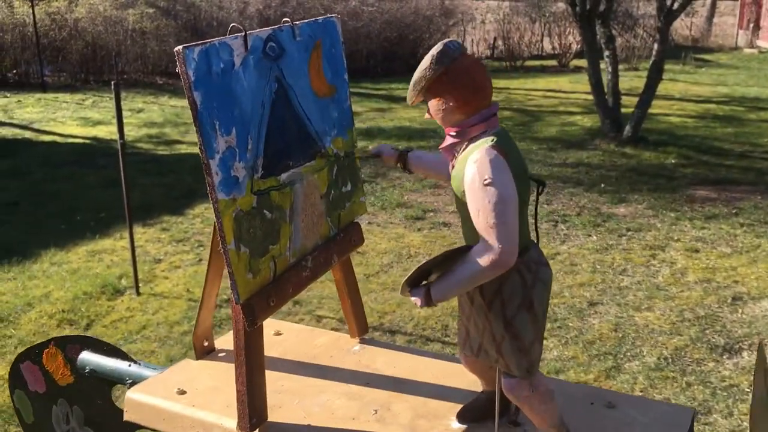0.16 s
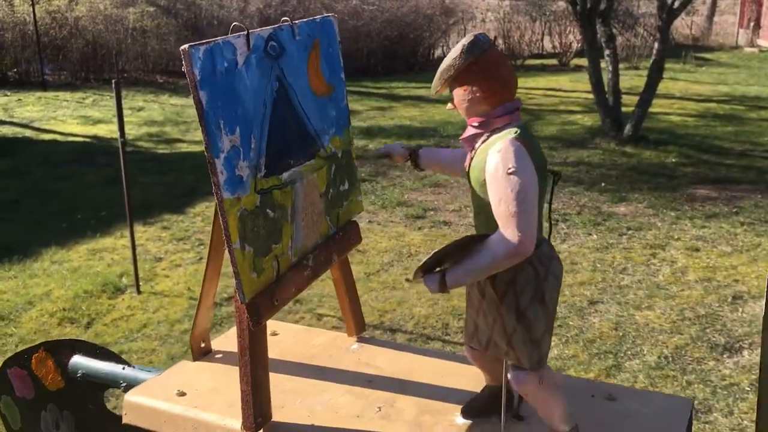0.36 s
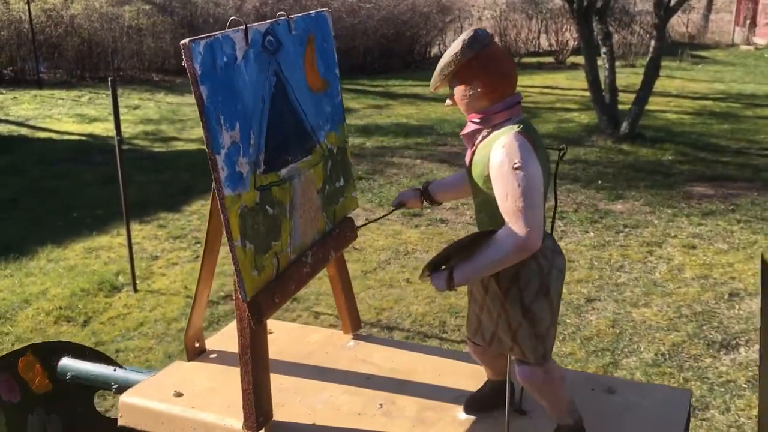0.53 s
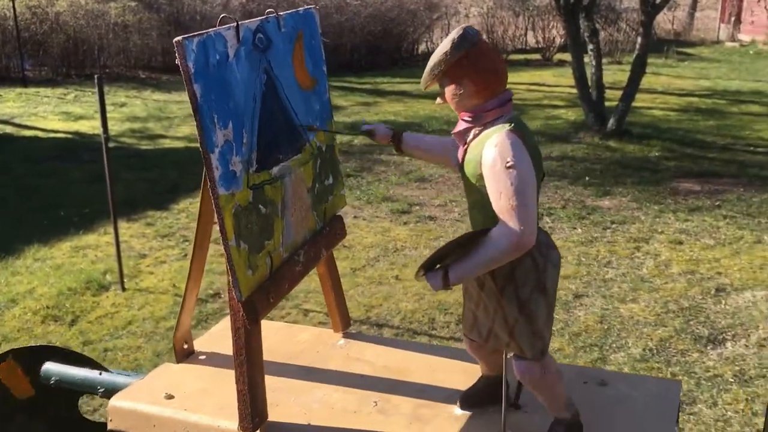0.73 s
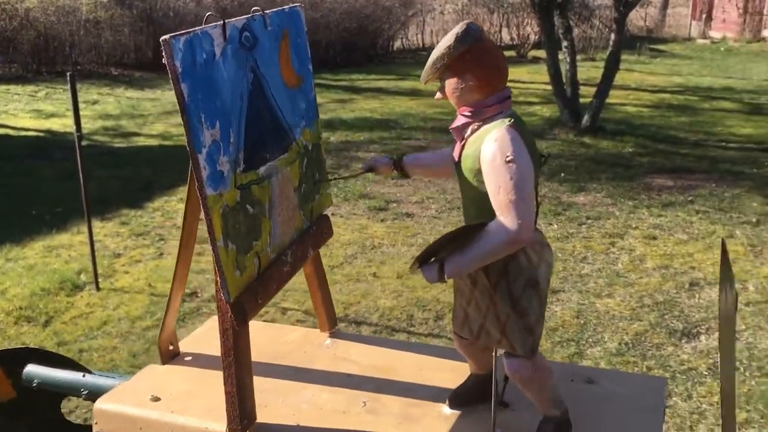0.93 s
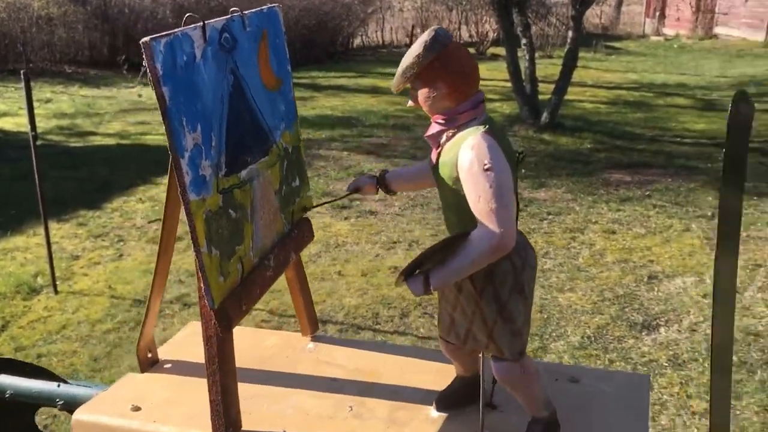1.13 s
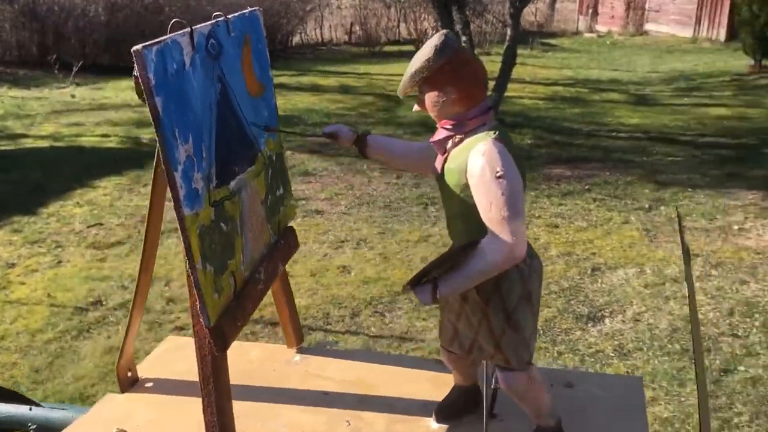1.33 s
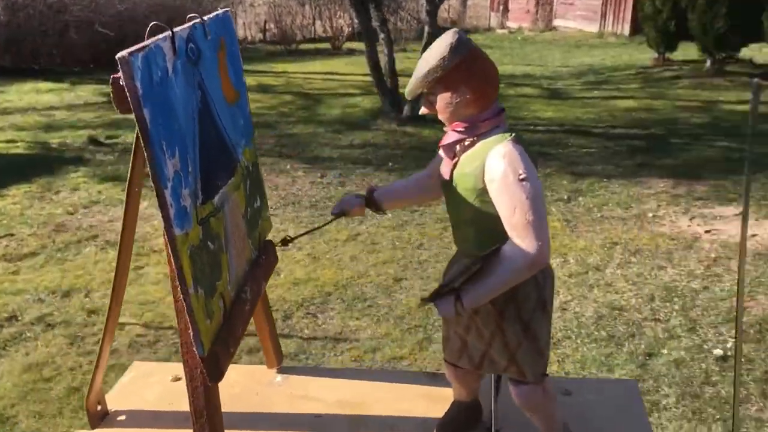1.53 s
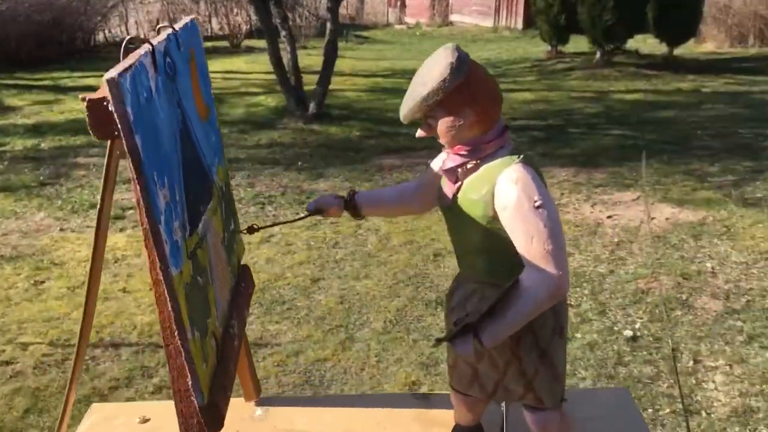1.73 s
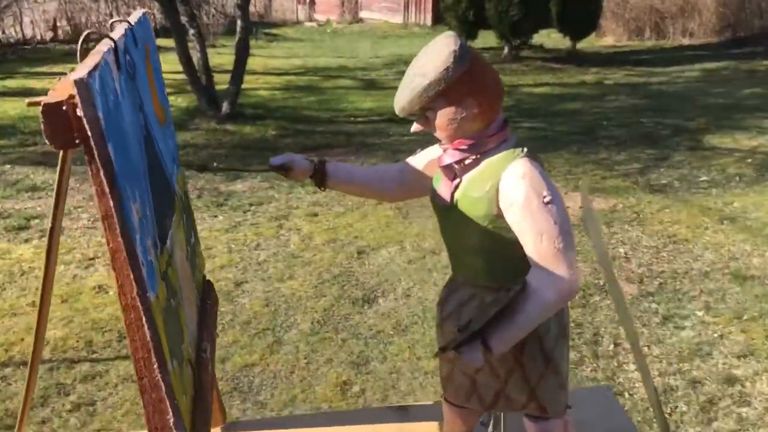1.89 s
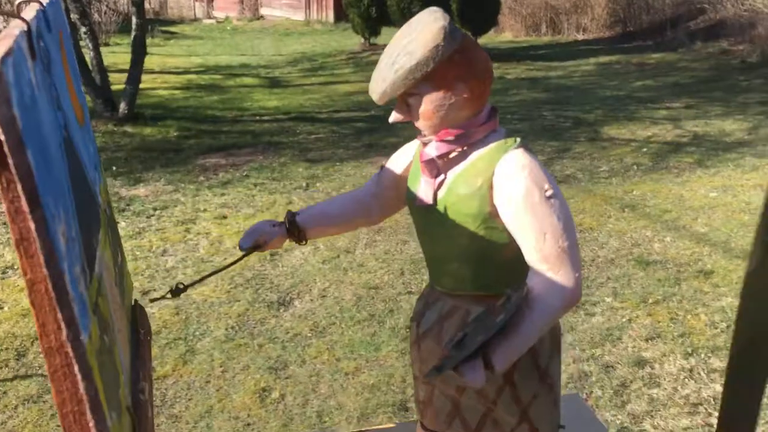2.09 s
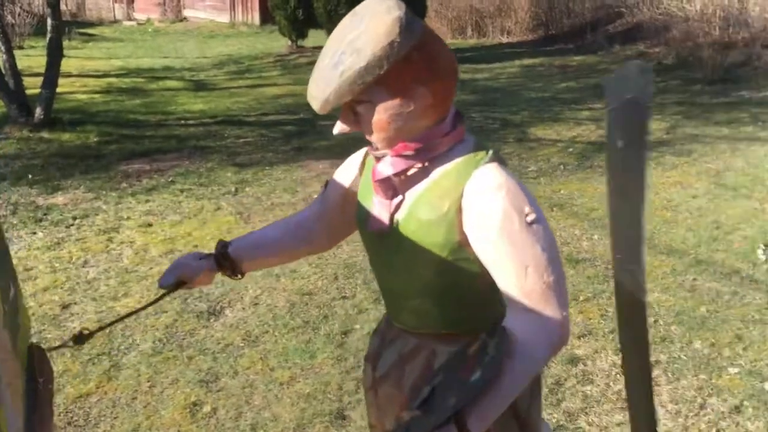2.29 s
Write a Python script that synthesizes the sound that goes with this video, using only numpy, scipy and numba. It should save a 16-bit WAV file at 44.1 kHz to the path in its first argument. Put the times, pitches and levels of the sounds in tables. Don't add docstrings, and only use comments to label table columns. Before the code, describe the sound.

Wooden garden figure knocks, scrapes and squeaks as wind cranks it, with gusts buffeting the microphone

```python
import sys
import numpy as np
from scipy import signal
from scipy.io import wavfile
from scipy.ndimage import uniform_filter1d
from numba import njit

SR = 44100
rng = np.random.default_rng(int(sys.argv[2]) if len(sys.argv) > 2 else 0)


def dump(signal):
    limited = np.clip(np.atleast_2d(signal).T, -1, 1)
    pcm = np.round(limited * 32767).astype(np.int16)
    wavfile.write(sys.argv[1], SR, pcm)


def undo_db(level):
    steps = np.asarray(level, float) / 20
    return 10 ** steps


N = 103635

# [t/s, peak level/dB, wood level/dB, tick level/dB]
KNOCKS = [(0.0014, -38.5, -1.5, -70), (0.0798, -37, 1.5, -71), (0.207, -59, 1.5, -68),
          (0.2307, -52, 11.5, -78), (0.4206, -34, 4.5, -78), (0.4688, -39, -0.5, -77),
          (0.609, -35.5, -17, -74), (0.627, -33, -2.5, -70), (0.7159, -29.5, -4.5, -73),
          (0.7396, -29.5, -5, -64), (0.7525, -37.5, 2.5, -74), (0.9718, -36.5, 4.5, -72),
          (1.295, -32.5, -6, -77), (1.31, -30.5, -5, -62.5), (1.5268, -13.5, -8, -50.5),
          (1.586, -47, -4, -67), (1.813, -58, 13, -79), (1.830, -43, 10, -81), (1.8357, -36, 12.5, -84),
          (1.844, -40.5, 11.5, -70), (1.859, -45, 9, -76), (1.87, -39, 11.5, -80), (1.882, -49, 17, -83),
          (1.898, -60, 9, -80), (1.914, -54, 9, -80), (1.5335, -29, 1, -70), (1.538, -31.5, 4.5, -73),
          (2.1119, -22.5, 1, -63), (2.2609, -44.5, 1, -79), (2.283, -48.5, 9, -82)]
# [f/Hz, level/dB, 60 dB decay/s]
WOOD_MODES = [(1040, -15, 0.047), (1528, 3, 0.016), (1631, -1, 0.031), (1866, 2.5, 0.008),
              (2197, -16, 0.03), (2344, -12.5, 0.031)]
# [f/Hz, level/dB, 60 dB decay/s]
WIRE_MODES = [(2653, -12, 0.0099), (3240, -3, 0.016), (3550, -1, 0.0094), (3800, -2.5, 0.012),
              (4100, -5.5, 0.011), (4300, -7.5, 0.013), (4520, -10, .012), (5060, -15, .01),
              (5760, -11, 0.011), (6530, -8, 0.0067), (7370, -13.5, 0.009)]
# [start t/s, length/s, level/dB]
GRINDS = [
    (0.224, 0.035, -65),
    (0.313, 0.045, -68.5),
    (.69, .09, -66),
    (1.25, 0.052, -74),
    (1.534, 0.057, -63),
    (1.828, 0.056, -58.5),
    (2.12, 0.056, -66),
    (2.255, 0.066, -69.5),
]
# [start t/s, length/s, level/dB]
SCRAPES = [
    (0.158, 0.13, -57),
    (0.437, 0.31, -67.5),
    (0.667, 0.16, -56),
    (1.219, 0.16, -55),
    (1.508, 0.029, -80),
    (1.772, 0.2, -56.5),
    (2.245, 0.04, -62),
]
# [f/Hz, width/Hz, level/dB]
GUIDE_MODES = [(1215, 70, 9), (1540, 70, 8), (1880, 55, 7), (3300, 300, -6)]
# [start t/s, length/s, level/dB]
SQUEAKS = [
    (0.102, 0.054, -58),
    (0.625, 0.061, -51),
    (1.159, 0.056, -57),
    (1.731, 0.066, -53.5),
    (2.333, 0.055, -57),
]
OVERTONES_DB = [-31, -28]
# [start t/s, f/Hz, level/dB]
PEEPS = [
    (0.617, 10800, -67.5),
    (1.157, 10960, -64),
    (1.719, 10860, -68.5),
    (2.325, 10900, -70),
]
# [t/s, peak level/dB]
TAPS = [
    (.002, -50),
    (.079, -46.5),
    (.629, -46.5),
    (.717, -43),
    (.731, -49),
    (.756, -42),
    (.971, -47),
    (1.813, -47.5),
    (1.871, -50),
]
# [centre t/s, length/s, level/dB]
GUSTS = [(-0, 0.097, -27), (0.071, 0.046, -31.5), (0.108, 0.072, -26), (0.151, 0.072, -20.5),
         (0.191, 0.061, -19), (0.232, 0.022, -37.5), (0.314, 0.063, -33.5), (0.373, 0.092, -28),
         (0.436, 0.067, -36.5), (0.499, 0.1, -32), (0.55, .06, -49.5), (0.603, 0.019, -43.5),
         (0.644, 0.062, -41.5), (0.754, 0.066, -36.5), (0.8, 0.065, -40), (0.858, 0.092, -44.5),
         (1.095, 0.57, -54.5), (1.208, 0.092, -53.5), (1.277, 0.12, -39), (1.383, 0.072, -24.5),
         (1.408, 0.016, -25), (1.465, 0.07, -29), (1.505, 0.073, -25), (1.58, 0.083, -36.5),
         (1.63, 0.061, -28.5), (1.693, 0.065, -35.5), (1.745, 0.078, -36.5), (1.851, 0.24, -47.5),
         (2.076, 0.086, -39.5), (2.121, 0.084, -47)]
# [centre t/s, length/s, f/Hz, level/dB]
THUMPS = [(.005, 0.063, 300, -40), (0.036, 0.021, 268, -42), (.128, 0.022, 325.4, -32.5),
          (0.158, 0.013, 633, -29), (0.185, 0.016, 572, -32.5), (0.357, 0.034, 276.8, -39.5),
          (0.386, 0.023, 385, -39), (0.446, 0.025, 214, -43), (1.266, .03, 265.4, -47.5),
          (1.382, 0.017, 561.4, -37.5), (1.403, 0.013, 580, -39), (1.379, 0.017, 289.3, -30.5),
          (1.403, 0.013, 310, -28), (1.462, 0.015, 255, -43), (1.503, 0.045, 170.7, -27.5),
          (1.638, 0.028, 373.6, -36), (1.697, 0.034, 296, -45.5), (1.734, 0.02, 214, -42),
          (2.097, 0.05, 198.1, -43.5)]
# [start t/s, length/s, first f/Hz, last f/Hz, level/dB]
WHISTLES = [(1.232, .115, 7830, 7780, -67), (1.42, .075, 5800, 5120, -54), (1.487, .055, 5200, 5145, -58),
            (1.535, .058, 5170, 5145, -59), (1.585, .15, 5140, 5160, -70), (1.728, .06, 4150, 4020, -69),
            (1.79, .045, 4010, 3980, -60), (1.85, .025, 4050, 4050, -62), (.805, .02, 5800, 6200, -69),
            (1.722, .014, 7900, 6600, -63), (1.932, .012, 7500, 6800, -68), (2.3, .012, 7900, 6600, -63),
            (2.165, .012, 5000, 6800, -64), (1.978, .01, 4900, 7000, -67), (1.883, .012, 4900, 7000, -65),
            (1.91, .03, 2250, 2250, -61), (1.852, .04, 2700, 2620, -59)]
# [start t/s, note length/s, top f/Hz, level/dB]
CHIRPS = [
    (1.829, .15, 8330, -65.5),
    (1.993, .17, 8270, -66),
    (2.176, .16, 8170, -62.5),
]
# [start t/s, length/s,
# centre f/Hz, width/Hz, level/dB]
CHATTER = [(.81, .1, 6000, 600, -73), (1.27, .15, 7300, 900, -69), (1.6, .12, 3700, 1100, -66),
           (1.83, .13, 5600, 1500, -69), (1.998, .15, 5600, 900, -67), (2.185, .165, 5650, 1000, -65),
           (.865, .08, 4500, 200, -73), (.99, .11, 4250, 250, -73), (1.13, .1, 4150, 250, -72),
           (2.29, .07, 7300, 1000, -66), (2.1, .1, 7300, 900, -70), (1.92, .08, 7400, 800, -71)]
# [f/Hz, level per Hz/dB]
HUSH_COLOUR = [(150, -5), (774, -11.5), (1560, -14), (2870, -27), (3550, -25.5), (8000, -33.5),
               (10500, -35), (15500, -30.5)]


def set_rms(x, db):
    return x * undo_db(db) / np.sqrt(np.mean(x ** 2))


@njit
def moving_filter(x, hz, damping):
    low, mid = np.empty(len(x)), np.empty(len(x))
    b, l = 0., 0.
    for i in range(len(x)):
        g = np.tan(np.pi * hz[i] / SR)
        v = (b + g * (x[i] - l)) / (1 + g * (g + damping))
        low[i], mid[i] = l + g * v, damping * v
        b, l = 2 * v - b, l + 2 * g * v
    return low, mid


def bandpass(x, hz, width):
    return moving_filter(x, np.full(N, 1. * hz), width / hz)[1]


def ring(x, hz, t60):
    pole = np.exp(2j * np.pi * hz / SR - np.log(1000) / (t60 * SR))
    return signal.lfilter([1], [1, -pole], x).imag


def span(start, length, edge):
    u = np.clip((np.arange(N) / SR - start) / length, 0, 1)
    ramp = np.clip(np.minimum(u, 1 - u) / edge, 0, 1)
    return u, np.sin(np.pi / 2 * ramp) ** 2


def walk(rate):
    k = int(SR / rate)
    steps = np.repeat(rng.standard_normal(N // k + 1), k)
    return 0.85 * uniform_filter1d(uniform_filter1d(steps, k), k)[:N]


def tone(hz):
    return np.sqrt(2) * np.sin(2 * np.pi * np.cumsum(hz) / SR)


def echo(x, t60):
    tail = rng.standard_normal(SR // 2) * 1000. ** (-np.arange(SR // 2) / SR / t60)
    return signal.fftconvolve(x, tail / np.sqrt(np.sum(tail ** 2)))[:N]


def sparks(rate, scatter_db):
    chance, sign, size = rng.random((3, N))
    clicks = (chance < rate / SR) * np.sign(sign - .5)
    return set_rms(clicks * undo_db(-scatter_db * np.log(1 - size)), 0)


def high_pass(x, order, hz):
    return signal.sosfilt(signal.butter(order, hz, "high", fs=SR, output="sos"), x)


def knocks():
    length, t = 4000, np.arange(4000) / SR
    rattle_s, contact_hz, tick_hz = 0.005, 6250, 8900
    knock_db, echo_db, echo_t60_s = -2.5, -9, 0.091
    out, rattle = np.zeros(N), sparks(1500, 1.0)
    soft = signal.butter(3, contact_hz, "low", fs=SR, output="sos")
    all_luck = rng.standard_normal((len(KNOCKS), 17))
    for (s, db, wood_db, tick_db), luck in zip(KNOCKS, all_luck):
        i = int((s + 0.00059) * SR)
        push = np.resize(rattle[i:], length) * 0.1 * np.exp(-t / rattle_s) * np.minimum(t / 0.00064, 1)
        push[0] = .4
        wire, wood = 0, 0
        for k, ((f, g, t60), r) in enumerate(zip(WIRE_MODES, luck)):
            wire = wire + (-1) ** k * undo_db(g + 2 * r) * ring(push, f * (1 + 0.008 * r), t60)
        for (f, g, t60), r in zip(WOOD_MODES, luck[11:]):
            wood = wood + np.sign(r) * undo_db(g + r) * ring(push, f * (1 + 0.005 * r), t60)
        body = signal.sosfilt(soft, wire + undo_db(wood_db) * wood) / 3
        hiss = uniform_filter1d(rng.standard_normal(length), size=3)
        tick = high_pass(hiss * np.exp(-t / 0.0051) * np.minimum(t / 0.00085, 1), 3, tick_hz)
        hit = undo_db(db + knock_db) * body + undo_db(tick_db + 19.5) * tick
        out[i:i + length] += hit[:N - i]
    out = high_pass(out, 3, 780)
    return out + undo_db(echo_db) * echo(out, echo_t60_s)


def grinds():
    grains = sparks(1200, 2.5) * undo_db(2.5 * walk(120))
    wire = 0
    for k, (f, g, t60) in enumerate(WIRE_MODES):
        wire = wire + (-1) ** k * undo_db(g) * ring(grains, f, t60)
    return set_rms(wire, 0) * sum(undo_db(db) * span(s, n, 0.2)[1] for s, n, db in GRINDS)


def scrapes():
    slips = sparks(4000, 2.5) * undo_db(2.2 * walk(80))
    out = 0
    for f, width, g in GUIDE_MODES:
        late = 0.035 * np.log2(1900 / min(f, 1900))
        strokes = sum(undo_db(db) * span(s + late, n, 0.36)[1] for s, n, db in SCRAPES)
        grating = set_rms(bandpass(bandpass(slips, f, width), f, f / 2), 0)
        out = out + undo_db(g - 9.0) * grating * strokes
    return out


def squeaks():
    squeak_hz, bend, peep_s, peep_rise = 4763, 0.01, 0.0187, 0.086
    out, drift = 0, 1 + 0.011 * walk(110)
    for s, n, db in SQUEAKS:
        u, env = span(s, n, 0.55)
        hz = squeak_hz * (drift + bend * (1 - 2 * u) ** 3)
        voice = sum(undo_db(g) * tone(k * hz) for k, g in zip((1, 2, 3), [0] + OVERTONES_DB))
        out = out + undo_db(db + 2. * walk(120)) * env * voice
    for s, hz, db in PEEPS:
        u, env = span(s, peep_s, 0.16)
        out = out + undo_db(db) * env * tone(hz * (1 + peep_rise * u + 0.0046 * walk(660)))
    return out + undo_db(-15) * echo(out, .1)


def taps():
    brace_hz, brace_t60_s = 1870, 0.037
    out = 0
    for (s, db), r in zip(TAPS, rng.standard_normal(len(TAPS))):
        push = span(s, .0003, .5)[1]
        out = out + undo_db(db) * ring(push, brace_hz * (1 + .02 * r), brace_t60_s) / 5
    return out


def steady(x):
    return x / np.sqrt(uniform_filter1d(x ** 2, size=2000) + 1e-9)


def wind():
    calm_db, eddy_db, rumble_hz = -57.5, -2.5, 59.2
    pop_s, pop_hz, pop_t60_s, pop_db = .1633, 480, .008, 1
    gust = undo_db(calm_db) + sum(undo_db(db) * span(s - n / 2, n, 0.56)[1] for s, n, db in GUSTS)
    hz = np.clip(82 * (gust / undo_db(-40)) ** 0.2045, 30, 2000)
    eddies = moving_filter(rng.standard_normal(N), hz, 1.8)[0]
    eddies = moving_filter(eddies, 2.0 * hz, 0.68)[0]
    eddies = moving_filter(eddies, 2.66 * hz, 1.1)[0]
    rumble = bandpass(bandpass(rng.standard_normal(N), rumble_hz, 64), rumble_hz, 64)
    slap = ring(span(pop_s, 0.00082, 0.77)[1], pop_hz, pop_t60_s)
    slap = slap / slap.max() + .8 * span(pop_s, .005, .25)[1]
    x = (steady(rumble) + undo_db(eddy_db) * steady(eddies)) * gust
    x = x + undo_db(pop_db) * slap / slap.max()
    swirl = 1 + .22 * walk(160)
    for s, n, f, db in THUMPS:
        x = x + undo_db(db) * span(s - n / 2, n, 0.74)[1] * tone(f * swirl)
    return high_pass(x, 5, 38.2)


def birds():
    settle_s, flutter_db, rough = 0.0092, 2.5, .6
    flick_s, flick_hz, flick_db, sag_hz = .018, 4000, -4, 750
    trees_db, trees_t60_s = -8, .22
    out, flutter = 0, walk(150)
    for s, n, first, last, db in WHISTLES:
        u, env = span(s, n, 0.29)
        hz = last * (1 + 0.0043 * flutter) + (first - last) * np.exp(-u * n / settle_s)
        out = out + undo_db(db + flutter_db * flutter - 1. * u) * env * tone(hz)
    for s, n, top_hz, db in CHIRPS:
        u, env = span(s, flick_s, 0.085)
        flick = tone(flick_hz + (top_hz - flick_hz) * u)
        out = out + undo_db(db + flick_db) * (1 + rough * walk(560)) * env * flick
        u, env = span(s + flick_s, n, 0.046)
        sag = tone(top_hz - sag_hz * u ** .65 + (50. + 220. * u ** 2) * walk(500))
        out = out + undo_db(db + 3.0 * flutter - 4.0 * u) * (1 + rough * walk(700)) * env * sag
    for s, n, hz, width, db in CHATTER:
        u, env = span(s, n, .12)
        wander = hz + width / 3 * walk(140)
        voices = moving_filter(rng.standard_normal(N), wander, width / hz / 2)[1]
        blur = set_rms(bandpass(voices, hz, 2 * width), db)
        out = out + blur * env * undo_db(3. * walk(110) + 3 - 7 * u)
    return out + undo_db(trees_db) * echo(out, trees_t60_s)


def hush():
    colour_hz, colour_db = np.transpose(HUSH_COLOUR)
    out, swell = 0, walk(0.5)
    for hz in 160 * 2 ** np.arange(0, 6.8, 1 / 3):
        db = np.interp(np.log(hz), np.log(colour_hz), colour_db) + 0.27 * swell + 0.43 * walk(8.97)
        noise = bandpass(bandpass(rng.standard_normal(N), hz, hz / 3), hz, hz / 3)
        out = out + undo_db(db) * noise
    return set_rms(out, -57.5)


def scene():
    figure = knocks() + grinds() + scrapes() + squeaks() + taps()
    return (figure + wind() + birds() + hush())[None]


def band_limit(x):
    return signal.sosfilt(signal.butter(12, 16440, fs=SR, output="sos"), x)


def record(dry):
    treble_cut = signal.ellip(8, .3, 60, 15850, fs=SR, output="sos")
    mix = signal.sosfilt(treble_cut, dry)
    return band_limit(mix)


dry = scene()
out = record(dry)
dump(out)
```